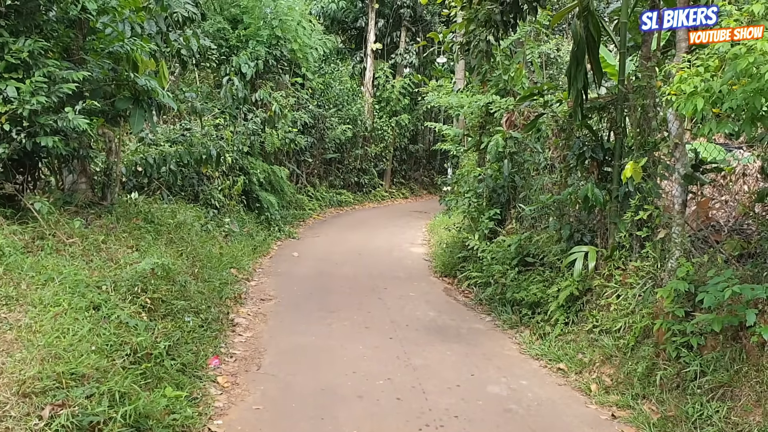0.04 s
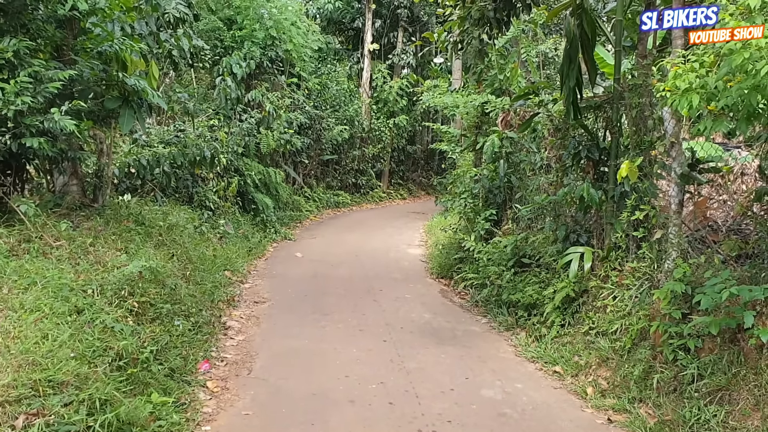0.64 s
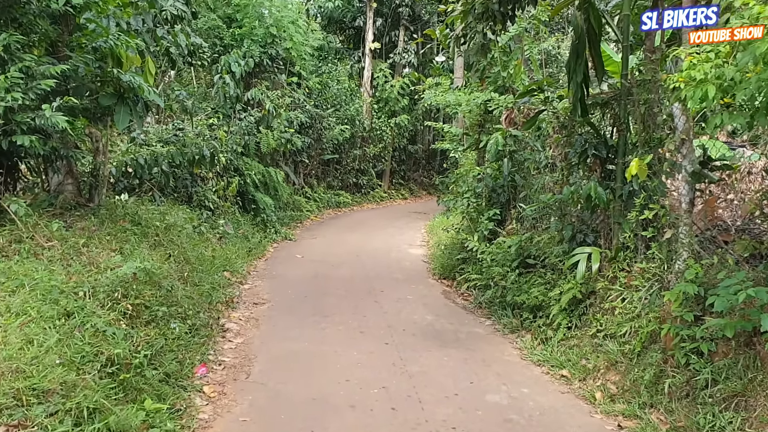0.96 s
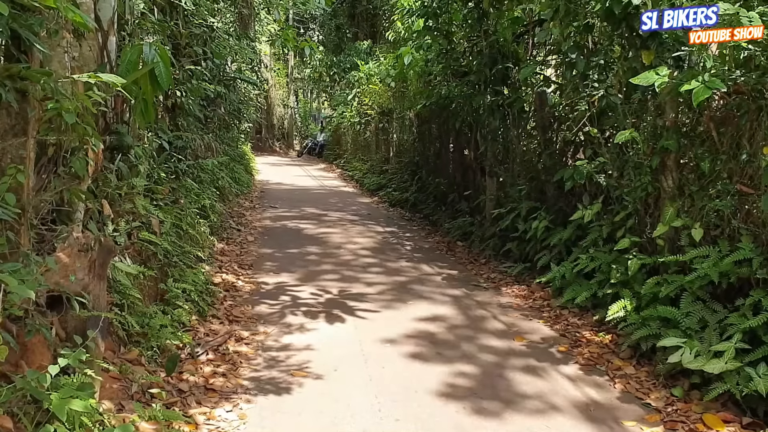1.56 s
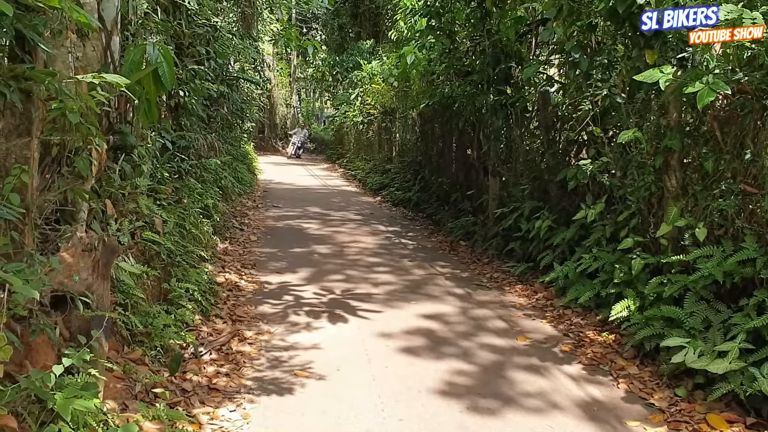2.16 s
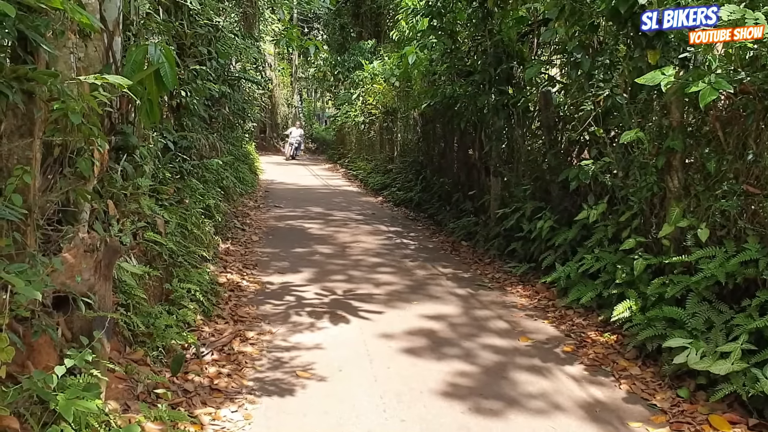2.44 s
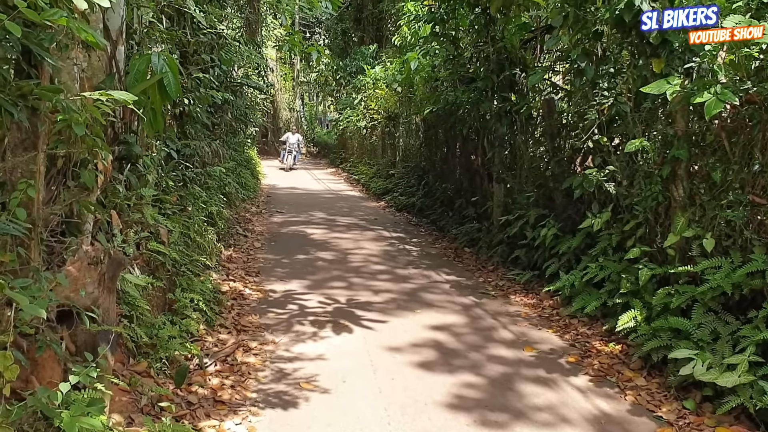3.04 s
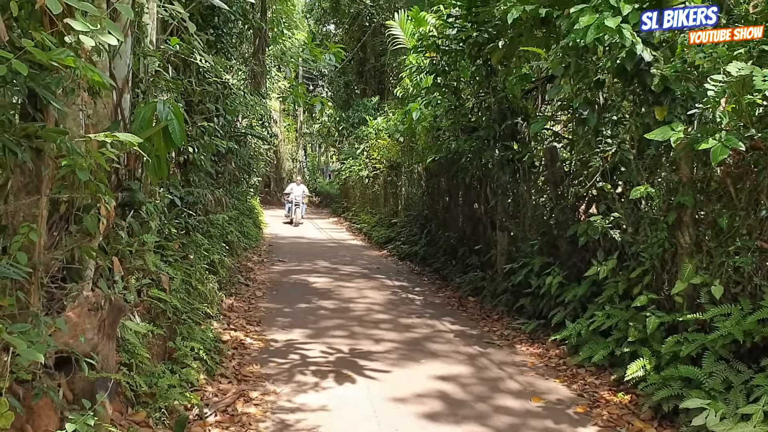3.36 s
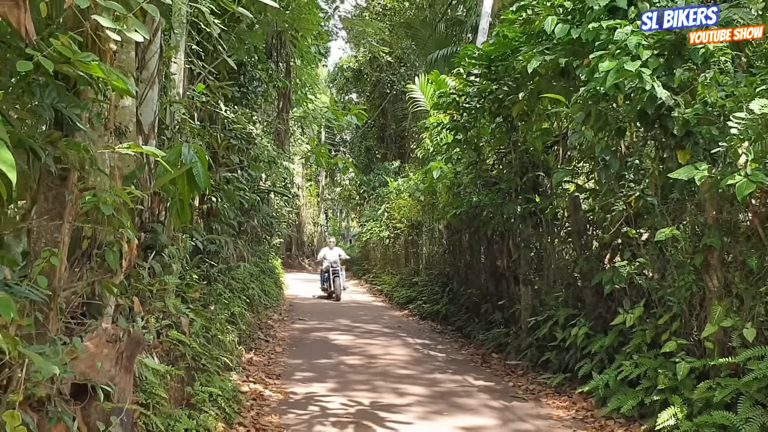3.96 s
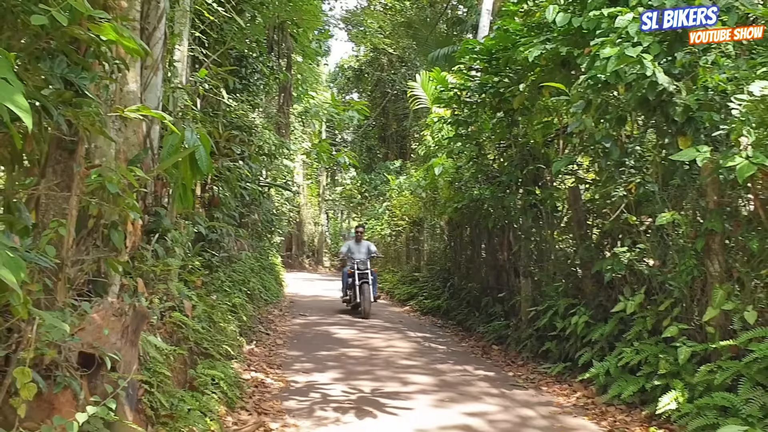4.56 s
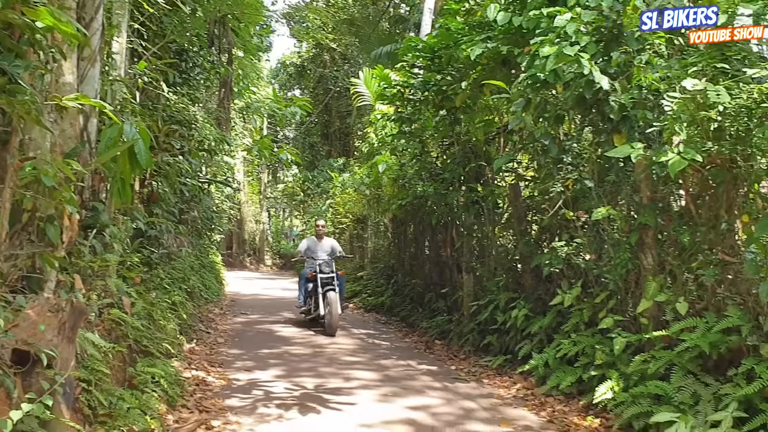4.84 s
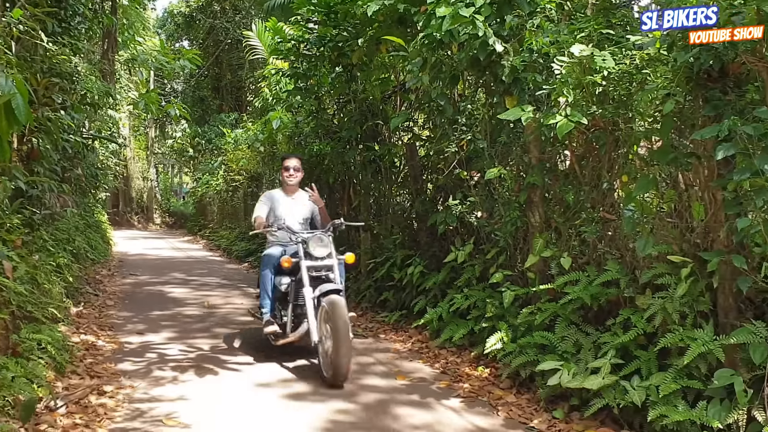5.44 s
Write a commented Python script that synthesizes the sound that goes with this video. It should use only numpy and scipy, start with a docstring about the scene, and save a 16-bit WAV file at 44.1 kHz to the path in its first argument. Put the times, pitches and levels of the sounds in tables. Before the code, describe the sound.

A motorcycle revs and fades round a bend, then pulls up a forest lane, crunches over dry leaves and rolls up close.

```python
"""A V-twin cruiser motorcycle revs, fades round a bend of a forest lane and coasts; a bird chirps once. Then
the scene changes: far away the bike ticks over, pulls up the lane, crosses dry leaves, eases off and rolls up
close. All along, two cylinders fire unevenly, one with a dull thud and one with a bright bark that rings the
exhaust pipe, and gas rasps after each firing. Valve clatter and the hiss of engine and tyres lie above that,
and the trees scatter a little of the sound."""
import sys
import numpy as np
from scipy import signal
from scipy.fft import rfft, irfft, next_fast_len
from scipy.io import wavfile
from scipy.ndimage import uniform_filter1d

SR = 44100
rng = np.random.default_rng(int(sys.argv[2]) if len(sys.argv) > 2 else 0)


def transcribe(u):
    """Save the signal u as a 16-bit wav file named by the first command-line argument.

    u: samples, shape (n,) or (channels, n), limited to [-1, 1]; the rate is SR.
    q: integer samples, one column per channel.
    """
    v = np.clip(np.atleast_2d(u).T, -1, 1)
    q = np.round(v * 32767).astype(np.int16)
    wavfile.write(sys.argv[1], SR, q)


N = 247401
T = np.arange(N) / SR
FFT_SIZE = next_fast_len(N + SR // 2, True)
HZ = np.maximum(np.fft.rfftfreq(FFT_SIZE, 1 / SR), 1)

# The eight stretches of the ride: rev, ride away, coast, idle, pull, shut throttle, light throttle,
# roll close. Each row: start in seconds, the bright firing's place in the cycle from 0 to 1, the dull
# firing's lead in cycles, dull over bright in dB, loss on every other dull firing in dB,
# timing scatter in seconds, gas in the rasp in dB, high fizz over the hiss in dB.
RIDE = [(0, 0.63, 0.29, 4.5, 5, 0.00043, 1, -2), (.18, 0.69, 0.33, 6, 1.5, .00016, 0.5, 1.5),
        (.93, 0.36, 0.38, 1, 6, .00016, 1, -1.5), (1.422, 0.78, 0.42, 15, 1.5, 0.00035, 5, -7.5),
        (1.84, 0.71, 0.37, 1, -2.5, 0.000029, 2.5, -7), (4.3, .72, 0.39, -5, 9, 0.000035, -3, -6.5),
        (4.507, 0.68, 0.42, 4, 30, 0.000031, -3.5, -6), (5.01, .245, 0.29, -3, 2, 0.00003, -1.5, -5.5)]
# Engine speed. Each row: time in seconds, four-stroke cycles per second.
ENGINE_SPEED = [(0, 32.89), (.12, 33.52), (.25, 27.4), (.7, 28.7), (.95, 27.19), (1.38, 27.41),
                (1.49, 19.93), (1.7, 20.7), (1.85, 18.53), (2.5, 21.91), (3.7, 32.21), (4.15, 35.21),
                (4.4, 33.41), (4.85, 33.28), (5.1, 30.5), (5.25, 31.69), (5.38, 29.62), (5.61, 28.93)]

# The notes at which the parts ring. Each row: pitch in Hz, width in Hz, relative strength in dB.
DULL_PIPE = [(69.4, 25.4, 0), (138.2, 61.4, 3), (315, 55, -9.5), (488, 140, -18), (526, 98, -16),
             (803, 290, -20.5), (1356, 65, -20), (1980, 1100, -38)]  # the dull cylinder's pipe
DULL_PIPE_IDLE = [(69.55, 32, -1.5), (127, 35, 3), (222, 60, -4), (329, 58, -5), (485, 170, -14),
                  (1010, 400, -27), (1355, 140, -17), (1710, 120, -26)]  # ticking over far away
BRIGHT_PIPE_REV = [(132, 62, 6), (208, 39, 8.5), (434, 66, -2), (520, 44, -7), (694, 110, -7.5),
                   (924, 56, -5), (1270, 200, -15)]  # the bright cylinder's pipe, before the bend
BRIGHT_PIPE_AWAY = [(84, 37, 6), (162, 55, 10), (242, 42, 6.5), (370, 50, 1), (450, 69, 0.5), (610, 74, -5),
                    (720, 78, -7), (858, 63, -5), (1216, 85, -14), (2140, 1100, -37)]
BRIGHT_PIPE_COAST = [(80, 7.8, 2), (109.1, 6.5, 9.5), (187, 51, -0.5), (259, 71, -3.5), (406, 200, -3),
                     (775, 93, -6), (1900, 2000, -33)]
BRIGHT_PIPE_FAR = [(106, 62, 3), (208, 37, 1.5), (242, 17, -3.5), (373, 49, -4), (476, 69, 1),
                   (583, 76, 1.5), (728, 22, -11), (867, 152, -9.5), (1268, 86, -13), (1740, 220, -20),
                   (2000, 57, -15)]
BRIGHT_PIPE_PULL = [(155, 71, 9), (299, 34, 6.5), (378, 39, 0), (506, 110, 1), (779, 55, -7.5),
                    (950, 135, -4), (1160, 90, -9), (1546, 100, -12.5), (1830, 250, -19.5)]  # at full throttle
BRIGHT_PIPE_NEAR = [(138.3, 53, 10), (215, 57, 0), (292.9, 14.5, 7), (362, 39, -5), (433, 69, -1.5),
                    (514, 89, 0), (785, 51, -7.5), (936, 64, -4), (1230, 122, -13.5), (1473, 52, -14.5),
                    (1820, 130, -20.5), (1940, 44, -22)]
BRIGHT_PIPE_ROLL = [(60.5, 25, -0.5), (100, 33, -4), (158.6, 31, 8), (254, 25, -3), (323, 74, 4),
                    (470, 50, -7), (566, 123, 0), (760, 89, 0), (1150, 100, -14), (1800, 190, -17)]  # rolling up
BRIGHT_PIPE_CLOSE = [(58, 16, -7), (103.5, 29, 3.5), (156, 23, 9.5), (238.6, 21, 2.5), (309, 79, 7.5),
                     (408, 57, -1), (492, 44, -1), (567, 150, -0.5), (737, 91, -1), (1100, 68, -17),
                     (1800, 140, -15)]  # the last few metres, where the notes sag
SHOCK_RING = [(980, 200, -11.5), (1170, 110, -3), (1470, 220, 4), (1843, 500, 1.5), (2917, 280, -10)]  # the pipe's mouth
ENGINE_FINS = [(1775, 300, -6.5), (2035, 220, 3.5), (2310, 340, 0.5), (2920, 530, -2), (4570, 840, -7)]

# How loud each layer is as time passes. Each row: time in seconds, level in dB.
RUMBLE_LEVEL = [(0, -51), (.2, -39), (.42, -39), (.68, -40.5), (.9, -49), (1.08, -37.5), (1.65, -46),
                (1.85, -37), (2.05, -36), (2.35, -38), (2.85, -35), (3.0, -35), (3.55, -33.5), (3.85, -34),
                (4.5, -36.5), (4.97, -36), (5.18, -28.5), (5.61, -27)]  # the exhaust below 100 Hz
BOOM_LEVEL = [(0, -30), (.1, -37), (.35, -33), (.92, -38), (1.3, -37.5), (1.55, -34), (1.78, -34),
              (1.93, -27.5), (2.1, -30), (2.4, -27.5), (2.92, -24.5), (3.0, -26.5), (3.09, -23),
              (3.9, -23.5), (4.27, -25.5), (4.34, -22.5), (4.75, -22), (5.07, -22.5), (5.46, -20.5),
              (5.61, -19)]  # just above the rumble
BARK_LEVEL = [(0, -35), (.09, -39), (.42, -32.5), (.88, -43.5), (.97, -48.5), (1.42, -48), (1.83, -45.5),
              (1.88, -39), (2.02, -39.5), (2.3, -32.5), (3.55, -28), (3.85, -25), (4.15, -25), (4.35, -28),
              (4.87, -21.5), (5.07, -28), (5.35, -24.5), (5.61, -23.5)]  # the exhaust's middle range
RASP_LEVEL = [(0, -36), (.1, -46.5), (.45, -44.5), (.63, -45.5), (.97, -55.5), (1.38, -58), (1.47, -50),
              (1.8, -46), (1.88, -38.5), (2.3, -36.5), (2.9, -34), (3.5, -31), (3.95, -26.5), (4.2, -29),
              (4.38, -31.5), (4.87, -27), (5.07, -35), (5.25, -31.5), (5.61, -33)]  # above the bark
SHOCK_LEVEL = [(2.9, -83), (3.3, -46.5), (3.7, -35.5), (4.0, -36), (4.2, -40.5), (4.35, -67), (4.5, -77)]
CLATTER_LEVEL = [(0, -57), (.12, -56.5), (.42, -53), (.9, -67), (1.4, -75), (1.5, -61.5), (1.8, -57),
                 (1.9, -58), (2.3, -58), (3.0, -51.5), (3.7, -38.5), (4.3, -60), (5.1, -53.5),
                 (5.61, -45.5)]
HISS_LEVEL = [(0, -49), (.12, -62.5), (.42, -55.5), (.95, -68.5), (1.4, -69), (1.43, -57), (1.8, -53),
              (2.1, -46), (3.7, -42.5), (3.95, -37.5), (4.42, -48), (5.15, -46.5), (5.61, -40.5)]
# The droning overtone. Each row: time in seconds, boost in dB (below zero it is a cut).
DRONE_BOOST = [(1.85, 9.5), (2.1, 6.5), (2.7, 1), (3.15, 6), (3.55, 4), (3.9, -1.5), (4.2, 2.5), (4.3, -8)]

# The tone colour of each noise. Each row: frequency in Hz, relative strength in dB.
HISS_COLOUR = [(880, -31), (1500, 15), (1580, 21.5), (1840, 12), (2540, -3.5), (3870, -11), (4530, -11.5),
               (6190, -12.5), (7900, -25), (8710, -23.5), (11400, -13.5), (12000, -16.5), (15500, -40)]
LEAF_COLOUR = [(1760, -35), (3000, -2), (3590, 12.5), (6150, 13), (7930, 1), (11300, 18), (12000, 15.5),
               (12900, 12.5), (15600, -5)]
GAS_COLOUR = [(70, -1), (300, 6.5), (560, 4.5), (700, 0), (900, -2), (1110, -4), (1300, -4.5),
              (1600, -6.5), (2050, -6.5), (2900, -18), (5000, -32.5), (12000, -39)]
WHIRR_COLOUR = [(1500, -30), (2300, -7.5), (3200, -2), (4300, -11), (6000, -29), (8500, -5),
                (12000, -25)]
TREE_COLOUR = [(60, -12), (280, -11), (550, 2), (1100, 9), (2200, 11)]

# Leaves and twigs snapping. Each row: time in seconds, relative strength in dB.
TWIG_SNAPS = [(3.985, -42), (4.0545, -26.5), (4.103, -34), (4.134, -26), (4.151, -30), (4.198, -37),
              (4.2446, -33), (4.257, -35.5), (4.342, -38), (4.365, -38.5), (4.445, -39), (4.51, -44),
              (4.539, -31.5), (4.5625, -46), (4.569, -43), (4.5873, -34.5), (4.599, -38), (4.613, -43)]
# The bird. One row: start in seconds, length in seconds, first and last pitch in Hz, level in dB.
BIRD_CHIRP = (1.085, .04, 6700, 5200, -67)


def firings(near_lead_cycles=.026, near_dull_db=5, close_dull_db=6):
    """Each cylinder fires once a cycle; on a light throttle every other dull firing is weaker."""
    cycles = np.cumsum(curves(ENGINE_SPEED)[0]) / SR
    count = np.arange(int(cycles[-1]) + 1)
    chance = rng.standard_normal((len(count), 4)).T
    middle_s = np.interp(count + .5, cycles, T)
    ride, near = ride_settings(middle_s), nearing(middle_s)
    bright_cycle = count + ride["place"]
    dull_cycle = bright_cycle - ride["lead"] - near_lead_cycles * near
    bright_s = np.interp(bright_cycle, cycles, T, right=np.inf)
    dull_s = np.interp(dull_cycle, cycles, T, right=np.inf)
    dull_db = ride["dull"] + near_dull_db * near + close_dull_db * closing(middle_s)
    dull_db -= ride["loss"] * (count % 2)
    rev, away, coast, idle, pull, *_ = ride_shares(middle_s)
    uneven_db = .7 + .8 * (idle + pull - near)  # slow chugs far off are less even
    dull = clicks(dull_s + ride["scatter"] * chance[0], gain(dull_db + uneven_db * chance[1]))
    bright = clicks(bright_s + ride["scatter"] * chance[2], gain(uneven_db * chance[3]))
    return dull, bright


def exhaust(dull, bright, usual_bark_db=-30, echo=.12, round_trip_s=.00417):
    """The ringing pipes give a low boom, a bark in the middle and a rasp mixed with rushing gas."""
    bark_db = curves(BARK_LEVEL)[0]
    extra_db = bark_db - usual_bark_db
    ring = ringing_pipes(dull, bright, rough_db=-43 - .5 * extra_db)  # faint firings are rougher
    ring = valve_pulsing(rebounds(silencer(ring)), dull + bright)
    below_bark, below_rasp = lowpass(237, order=10), lowpass(557, order=10)
    bark = filtered(ring, (below_rasp - below_bark) * (1 + echo * delay(round_trip_s)))
    # the boom and the rasp build up in the pipe just after the bark
    boom = filtered(ring, below_bark * (1 - lowpass(47, order=9)) * delay(.000078))
    rasp = filtered(ring, (1 - below_rasp) * lowpass(3240, order=8) * delay(.00153))
    # the gas gives way as the bark grows and the shocks take over
    gas_db = ride_settings()["gas"] - .2 * extra_db - 2.5 * nearing()
    rasp = at_level(rasp, 0) + at_level(rushing_gas(dull, bright), gas_db)
    return bass(boom) + at_level(bark, bark_db) + at_level(rasp, curves(RASP_LEVEL)[0])


def ringing_pipes(dull, bright, rough_db):
    """Each firing rings its pipe with a click and a puff; the notes follow throttle and distance."""
    rev, away, coast, idle, pull, shut, light, close = ride_shares()
    near, closest = nearing(), closing()
    blow, thud = (p + gain(rough_db) * puffs(p, delay_s=0, length_s=.003) for p in (bright, dull))
    blend = [(DULL_PIPE, thud * (1 - idle)), (DULL_PIPE_IDLE, thud * idle),
             (BRIGHT_PIPE_REV, blow * rev), (BRIGHT_PIPE_AWAY, blow * away),
             (BRIGHT_PIPE_COAST, blow * coast), (BRIGHT_PIPE_FAR, blow * (idle + pull - near)),
             (BRIGHT_PIPE_PULL, blow * near), (BRIGHT_PIPE_NEAR, blow * (shut + light)),
             (BRIGHT_PIPE_ROLL, blow * (close - closest)), (BRIGHT_PIPE_CLOSE, blow * closest)]
    return sum(filtered(push, resonances(notes)) for notes, push in blend)


def silencer(ring, hz=540, width_hz=170):
    """The silencer briefly holds back the middle notes, which rounds each beat."""
    chamber = 1 + 1j * (HZ ** 2 - hz ** 2) / (HZ * width_hz)
    return filtered(ring, np.conj(chamber) / chamber)


def rebounds(ring):
    """Under load and up close, part of each blow escapes at once; the rest bounces in the pipe."""
    *_, pull, shut, light, close = ride_shares()
    for share, escape, trip_s in [(pull, .64, .00417), (close, .79, .003)]:
        trip = delay(trip_s)
        bounced = filtered(ring, (escape + trip) / (1 + escape * trip))
        ring = ring + share * (bounced - ring)
    return ring


def valve_pulsing(ring, pulses, open_s=.02, shut_db=-12):
    """Under load the pipe is driven while a valve is open, and falls back in between."""
    rev, away, coast, idle, pull, *_ = ride_shares()
    one_opening = 1 / (1 + (T[:SR // 10] / open_s) ** 12)
    opening = np.clip(signal.fftconvolve(pulses, one_opening)[:N], 0, 1)
    return ring * gain(shut_db * pull * (1 - opening))


def bass(boom):
    """The deep rumble and the boom above it swell and sink separately."""
    boom = drone(boom)
    rumble = filtered(boom, lowpass(100, order=16))
    return at_level(rumble, curves(RUMBLE_LEVEL)[0]) + at_level(boom - rumble, curves(BOOM_LEVEL)[0])


def drone(boom, overtone=5):
    """One overtone stands out as a firm note, most of all early on, and is cut as the throttle shuts."""
    turn = np.exp(2j * np.pi * overtone * np.cumsum(curves(ENGINE_SPEED)[0]) / SR)
    window = np.hanning(6600)
    # pick out the overtone: shift it down to 0 Hz, smooth it, shift it back
    smoothed = signal.fftconvolve(boom / turn, window / window.sum(), "same")
    note = 2 * np.real(turn * smoothed)
    return boom + (gain(curves(DRONE_BOOST)[0]) - 1) * note


def rushing_gas(dull, bright, dull_share=.39, steady=.55):
    """Gas puffs out just after each firing, on top of a steady rush."""
    bursts = puffs(bright + dull_share * dull, delay_s=.006, length_s=.003)
    return filtered(bursts + steady * rng.standard_normal(N), colour(GAS_COLOUR))


def shocks(bright, rough_db=-38, first_s=.00047, trip_s=.0041):
    """At full throttle each blow steepens into a shock that cracks three times at the pipe's mouth."""
    blow = bright + gain(rough_db) * puffs(bright, delay_s=0, length_s=.00062)
    round_trips = gain(-4) + gain(1) * delay(trip_s) + delay(2 * trip_s)
    cracks = filtered(blow, resonances(SHOCK_RING) * round_trips * delay(first_s))
    return at_level(cracks, curves(SHOCK_LEVEL)[0])


def bark_flicks(bright, from_hz=480, to_hz=1685, rise_s=.01074, fade_s=.0048, level_db=-40):
    """Up close the treble of each bark arrives late, as a quick upward flick."""
    *_, close = ride_shares()
    age = T[:SR // 20]
    along = np.minimum(age / rise_s, 1)
    hz = from_hz + (to_hz - from_hz) * along
    flick = np.sin(np.pi * along) * np.exp(-age / fade_s) * np.sin(2 * np.pi * np.cumsum(hz) / SR)
    flicks = filtered(bright, rfft(flick, FFT_SIZE) * delay(.00065))
    return at_level(flicks, level_db) * close


def valve_clatter(dull, bright, steady=.49):
    """Valve gear rattles against the engine's fins once for each firing, however hard it is."""
    taps = np.sign(dull) + filtered(np.sign(bright), delay(.0082))
    rattle = np.array([puffs(taps, delay_s=.00063, length_s=.0013) + steady * rng.standard_normal(N)
                       for _ in range(2)])
    metal = filtered(rattle, resonances(ENGINE_FINS))
    return panned(at_level(metal, curves(CLATTER_LEVEL)[0]), left_db=6)


def hiss(dull, bright, throb=.25):
    """A wide hiss of engine and tyres throbs faintly with the firings."""
    hiss_db = curves(HISS_LEVEL)[0]
    noise = np.array([rng.standard_normal(N) + throb * puffs(bright + dull, .0066, length_s=.0054)
                      for _ in range(2)])
    shape = colour(HISS_COLOUR) * (1 - lowpass(2740, order=6))
    below_fizz = lowpass(7660, order=12)
    body = at_level(filtered(noise, shape * below_fizz), hiss_db)
    # the microphone's colouring adds a high fizz
    fizz = at_level(filtered(noise, shape * (1 - below_fizz)), hiss_db + ride_settings()["fizz"])
    return panned(body + fizz, left_db=8)


def whirr(under_hiss_db=2):
    """Heard from behind, the engine's moving parts add a smooth, unbroken hiss."""
    rev, away, coast, *_ = ride_shares()
    noise = filtered(rng.standard_normal((2, N)), colour(WHIRR_COLOUR))
    noise = at_level(noise, curves(HISS_LEVEL)[0] - under_hiss_db)
    return panned(noise * (rev + away + coast), left_db=5)


def leaves(grains_per_s=2000, spread_db=5, snap_db=-6, rustle_db=-16, rustle_s=.016):
    """Dry leaves crackle under the tyres; a few snap loudly, each inside a short rustle."""
    grains = rng.random(N) < grains_per_s / SR
    grains = grains * gain(spread_db * np.minimum(rng.exponential(size=N), 3.5))
    times, strength_db = np.transpose(TWIG_SNAPS)
    snaps = clicks(times, gain(strength_db + snap_db))
    rustles = sum(gain(db + rustle_db) * np.exp(-abs(T - at) / rustle_s) for at, db in TWIG_SNAPS)
    crackle = np.array([puffs(grains, delay_s=0, length_s=.0012) for _ in range(2)])
    crackle = at_level(filtered(crackle, colour(LEAF_COLOUR)), 0)
    crackle *= np.hypot(gain(leaf_patch_db()), rustles)
    cracks = np.array([puffs(snaps, delay_s=0, length_s=.00053) for _ in range(2)])
    return panned(crackle + filtered(cracks, colour(LEAF_COLOUR)), left_db=8)


def leaf_patch_db(start_s=3.92, length_s=.381, peak_db=-32.5, fade_db_per_s=66, edge_db_per_s=210):
    """The crackle leaps up at a patch of leaves and fades across it; stray leaves follow the hiss."""
    age = T - start_s
    outside_s = abs(age - np.clip(age, 0, length_s))
    patch_db = peak_db - fade_db_per_s * np.maximum(age, 0) - edge_db_per_s * outside_s
    stray_db = curves(HISS_LEVEL)[0] - 15.5
    return np.maximum(patch_db, stray_db)


def tree_echo(x, die_away_s=.26, echo_db=-14):
    """Trunks and foliage scatter a short echo, different at each ear and weak in the bass."""
    age = T[:SR // 2]
    tail = rng.standard_normal((2, len(age))) * gain(-60 * age / die_away_s) * (age > .006)
    tail /= np.sqrt(np.sum(tail ** 2, axis=1, keepdims=True))
    return gain(echo_db) * filtered(x, rfft(tail, FFT_SIZE) * colour(TREE_COLOUR))


def bird():
    """A bird gives one thin, falling chirp in the trees."""
    start_s, length_s, first_hz, last_hz, db = BIRD_CHIRP
    along = np.clip((T - start_s) / length_s, 0, 1)
    hz = first_hz + (last_hz - first_hz) * along
    return gain(db) * np.sin(np.pi * along) * np.sin(2 * np.pi * np.cumsum(hz) / SR)


def ride_shares(at=T, blend_s=.035):
    """How much each stretch of the ride counts, from 0 to 1; each blends into the next."""
    begun = [np.clip((at - row[0]) / blend_s + .5, 0, 1) for row in RIDE[1:]]
    return -np.diff([np.ones_like(at), *begun, np.zeros_like(at)], axis=0)


def ride_settings(at=T):
    """The ride's settings at the given times, by name."""
    names = "place", "lead", "dull", "loss", "scatter", "gas", "fizz"
    return dict(zip(names, np.transpose(RIDE)[1:] @ ride_shares(at)))


def nearing(at=T, start_s=3.04, length_s=.96):
    """How far the bike has come out of the distance during the pull, from 0 to 1."""
    rev, away, coast, idle, pull, *_ = ride_shares(at)
    return pull * np.clip((at - start_s) / length_s, 0, 1)


def closing(at=T, start_s=5.3, length_s=.16):
    """How far the dull pipe has come into view over the last few metres, from 0 to 1."""
    return np.clip((at - start_s) / length_s, 0, 1)


def clicks(times, sizes):
    """Single clicks, each shared between two neighbouring samples."""
    out, at = np.zeros(N + 2), np.clip(times * SR, 0, N)
    np.add.at(out, at.astype(int), sizes * (1 - at % 1))
    np.add.at(out, at.astype(int) + 1, sizes * (at % 1))
    return out[:N]


def puffs(pulses, delay_s, length_s):
    """Noise that swells and dies after each pulse."""
    age = np.maximum(T[:SR // 10] - delay_s, 0) / length_s
    return signal.fftconvolve(pulses, age * np.exp(1 - age))[:N] * rng.standard_normal(N)


def resonances(notes):
    """A filter that rings at the given notes."""
    power = sum((gain(db) / (1 + ((hz ** 2 - HZ ** 2) / (HZ * width)) ** 2)) ** 2
                for hz, width, db in notes)
    # fold the early half onto the late half, so the ringing never comes before the hit
    cepstrum = irfft(np.log(power + 1e-9) / 2, FFT_SIZE)
    cepstrum[1:FFT_SIZE // 2] *= 2
    cepstrum[FFT_SIZE // 2 + 1:] = 0
    return np.exp(rfft(cepstrum))


def lowpass(hz, order):
    """A filter that keeps the lows; one minus it keeps the highs."""
    return 1 / (1 + (HZ / hz) ** order)


def colour(points):
    """A filter drawn through (Hz, dB) points."""
    hz, db = np.transpose(points)
    return gain(np.interp(np.log(HZ), np.log(hz), db))


def delay(seconds):
    """A filter that only makes the sound late."""
    return np.exp(-2j * np.pi * HZ * seconds)


def filtered(x, response):
    """Pass a sound through a filter."""
    return irfft(rfft(x, FFT_SIZE) * response, FFT_SIZE)[..., :N]


def at_level(x, db, window=4400):
    """Make a sound's average level follow db, keeping its single beats."""
    power = uniform_filter1d(uniform_filter1d(x ** 2, window), window)
    return x * gain(db) / np.sqrt(np.maximum(power, 1e-14))


def panned(x, left_db):
    """Make the left channel left_db louder than the right."""
    left = 2 / (1 + gain(-left_db))
    return x * np.array([left, 2 - left]).reshape(2, -1)


def curves(table):
    """Join a table's points in time with straight lines, one curve for each value column."""
    times, *columns = np.transpose(table)
    return [np.interp(T, times, column) for column in columns]


def gain(db):
    """Turn decibels into a multiplier."""
    return 10 ** (np.asarray(db) / 20)


def scene(right_lag_s=.00005, bend_left_db=3.5, lane_left_db=5):
    """The bike is a little to the left, so the right ear hears it later and weaker."""
    dull, bright = firings()
    bike = exhaust(dull, bright) + shocks(bright) + bark_flicks(bright)
    direct = np.array([bike, filtered(bike, delay(right_lag_s))])
    rev, away, coast, *_ = ride_shares()
    left_db = lane_left_db + (bend_left_db - lane_left_db) * (rev + away + coast)
    pipes = panned(direct + tree_echo(bike), left_db)
    return pipes + valve_clatter(dull, bright) + hiss(dull, bright) + whirr() + leaves() + bird()


def record(dry, top_hz=15750):
    """Cut off the very highest treble."""
    return signal.sosfilt(signal.ellip(10, .2, 80, top_hz, fs=SR, output="sos"), dry)


dry = scene()
out = record(dry)
transcribe(out)
```